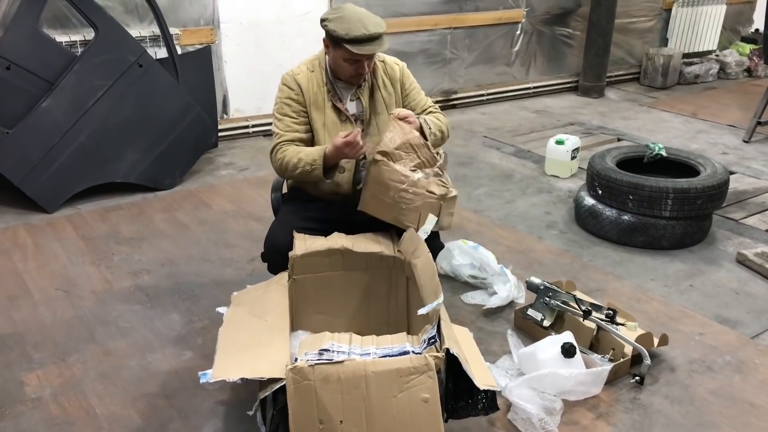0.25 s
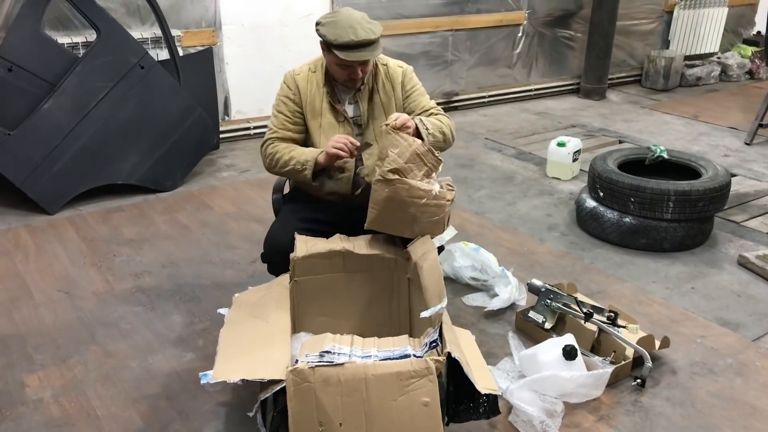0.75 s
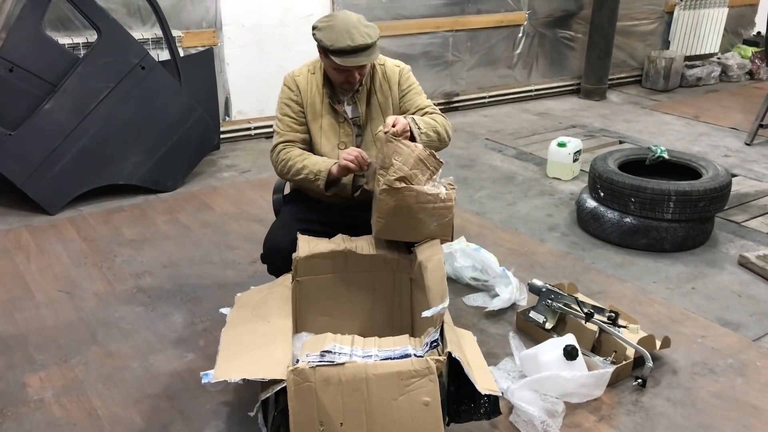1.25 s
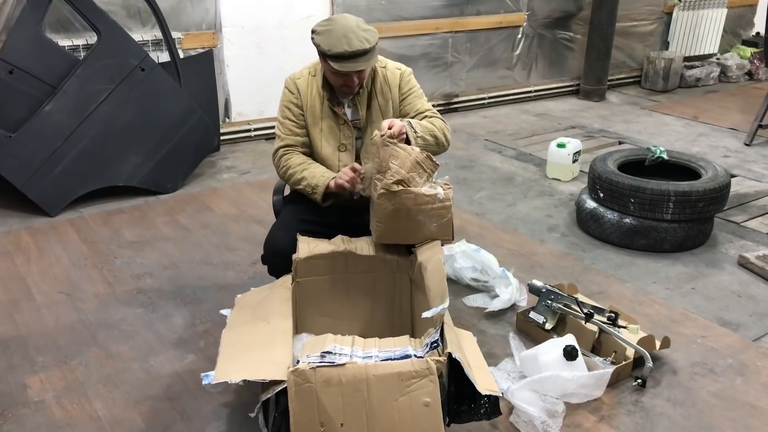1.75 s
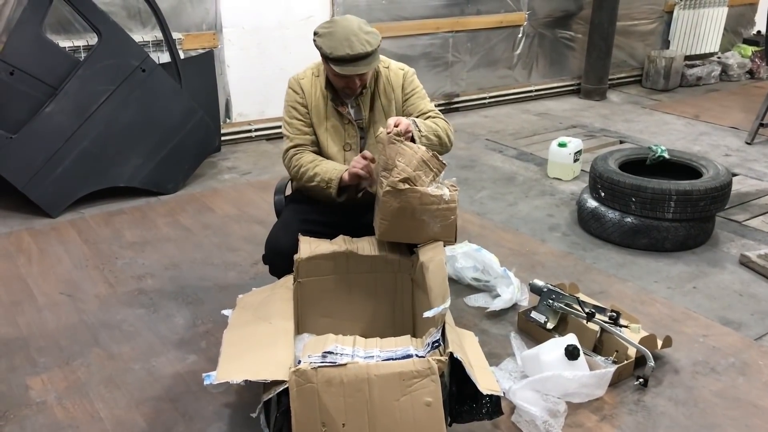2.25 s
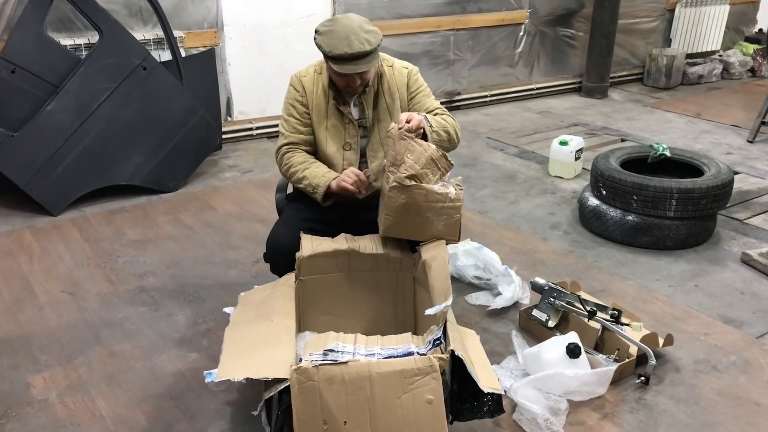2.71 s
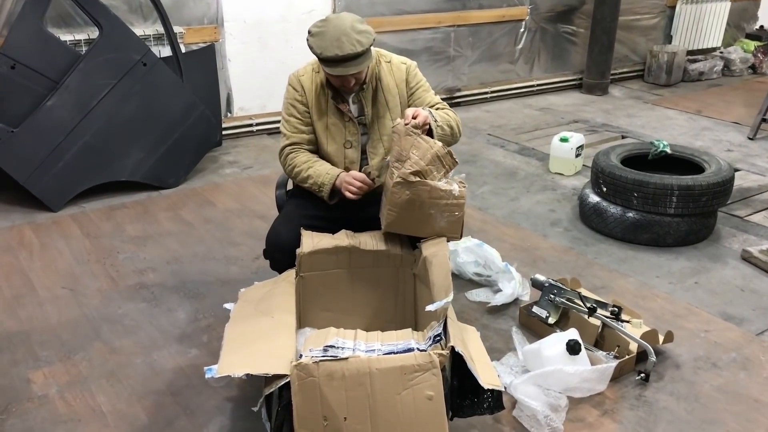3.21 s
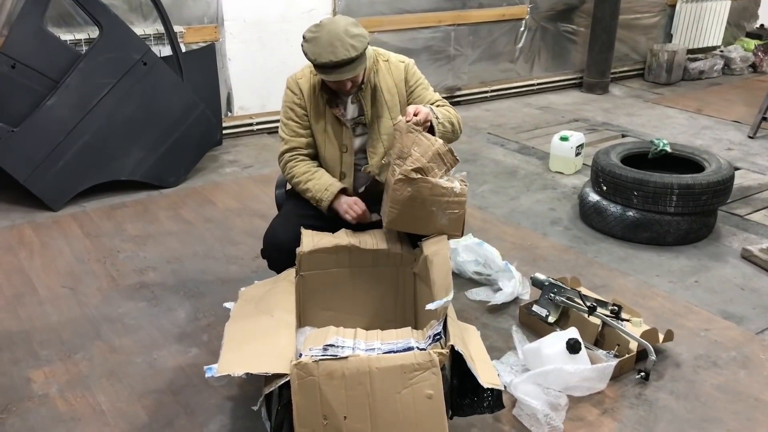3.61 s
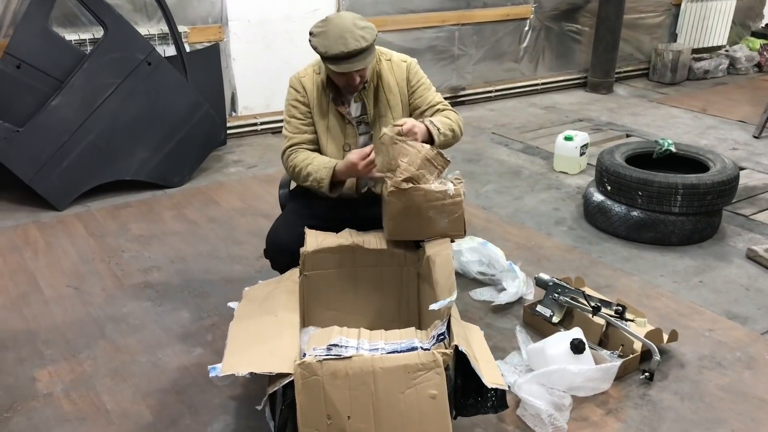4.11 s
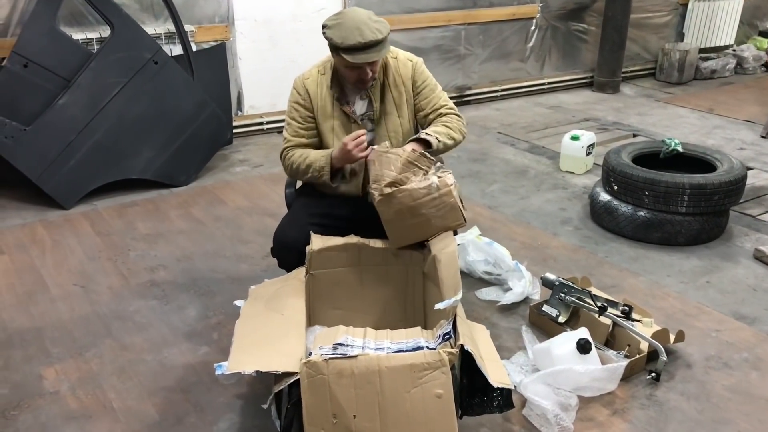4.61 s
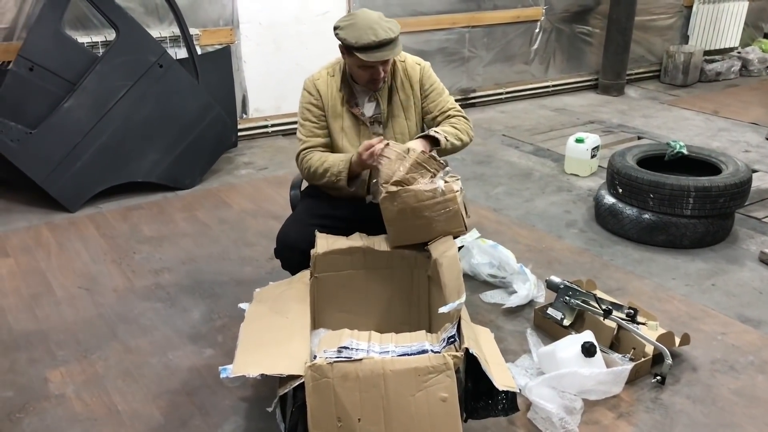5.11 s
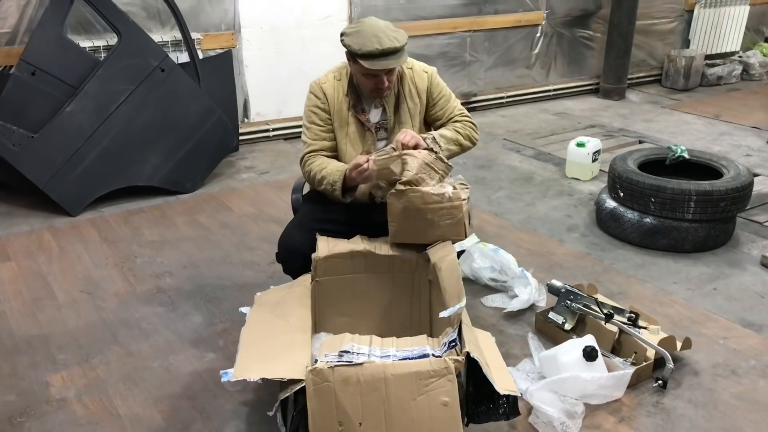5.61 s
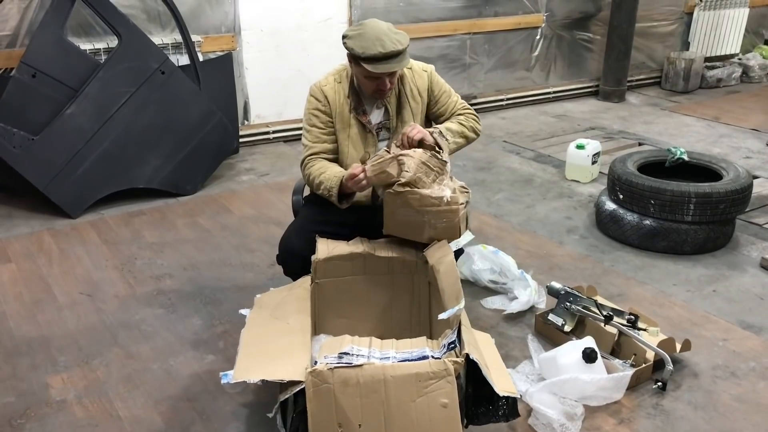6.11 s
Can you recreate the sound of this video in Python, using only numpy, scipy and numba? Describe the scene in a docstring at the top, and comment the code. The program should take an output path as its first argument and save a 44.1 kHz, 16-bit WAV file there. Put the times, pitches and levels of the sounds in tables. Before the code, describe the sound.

Hands work stiff wrapping paper on a small parcel, with faint rustles, growing bursts of crumpling and hard crackling pops near the end, over low room rumble.

```python
"""Thick brown paper crumples and tears as hands wrap a parcel in a concrete garage.
Creases buckle in swarms of tiny cracks: band-filtered noise under decaying bursts of power.
Larger creases snap singly, and dragged palms send uneven noise slips through a parcel resonance.
Free panels and the hollow parcel ring along; bare walls add a short noise tail.
Shaped noise lies underneath: the building's low rumble and the microphone's hiss."""
import sys
import numpy as np
from scipy import signal
from scipy.fft import rfft, irfft, next_fast_len
from scipy.io import wavfile
from scipy.ndimage import uniform_filter1d
from numba import njit

SR = 44100
rng = np.random.default_rng(int(sys.argv[2]) if len(sys.argv) > 2 else 0)


def materialize(psi):
    """Save the field psi as 16-bit PCM at rate SR to the path in sys.argv[1].

    A 1-D psi becomes a single channel; in a 2-D psi each row is a channel.
    """
    bounded = np.clip(np.atleast_2d(psi).T, -1, 1)
    quanta = np.round(bounded * 32767).astype(np.int16)
    wavfile.write(sys.argv[1], SR, quanta)


def gain_from_decibels(decibels):
    """Convert decibel values to linear amplitude factors."""
    exponent = np.asarray(decibels, float) / 20
    return 10 ** exponent


N = 280035
TIME = np.arange(N) / SR
BANDS_HZ = 125 * 2 ** np.arange(0, 7.1, .5)  # half-octave steps


def unit(x):
    """Scale to rms 1."""
    return x / np.sqrt(np.mean(x ** 2))


def spectrum_db(table, hz):
    """Read (frequency [Hz], level [dB]) points on a log-frequency axis."""
    points_hz, db = np.transpose(table)
    return np.interp(np.log(np.maximum(hz, 1)), np.log(points_hz), db)


def curve(table, column):
    """Join one column of rows that begin with a time [s] by straight lines."""
    columns = np.transpose(table)
    return np.interp(TIME, columns[0], columns[column])


def band(x, hz):
    """Keep half an octave round hz."""
    edges = hz * 2 ** -.25, min(hz * 2 ** .25, .48 * SR)
    return signal.sosfilt(signal.butter(2, edges, "bandpass", fs=SR, output="sos"), x)


def fade(x, t60):
    """Let every impulse of power die away 60 dB in t60 seconds."""
    return signal.lfilter([1], [1, -np.exp(-2 * np.log(1000) / (t60 * SR))], x)


def by_part(hz, parcel, sheet, crackle):
    """Blend levels: parcel in the lows, sheet in the middle, crackle in the treble."""
    place = np.interp(np.log(hz), np.log([450, 1000, 2000, 4000]), [0, 1, 1, 2])
    return parcel * max(1 - place, 0) + sheet * (1 - abs(place - 1)) + crackle * max(place - 1, 0)


# Hands shifting the parcel between pulls:
# (time [s], relative crackle level [dB], body against crackle [dB])
HANDLING = [(0.0, -53.5, -4), (0.63, -57.5, -4), (0.87, -68, -1), (1.45, -64.5, -1), (1.63, -57, -2),
            (2.47, -69.5, -9), (2.67, -68, 2), (3.25, -71.5, -5), (4.12, -63, -5.5), (4.24, -47.5, -2),
            (4.42, -46.5, -6.5), (5.04, -62, 0), (5.25, -42, -10), (5.48, -57, -3), (5.94, -52, -7.5),
            (6.35, -58.5, -4)]
# Pulls that crumple or rip the sheet:
# (start [s], rise [s], hold [s], relative crackle level [dB], body against crackle [dB])
PULLS = [(.10, 0.042, 0.048, -50, -2), (0.433, .05, 0.046, -53, -2.5), (0.677, 0.022, 0.12, -54, -12),
         (1.15, .01, 0.079, -59, -0.5), (1.567, 0.014, 0.12, -51, -7), (1.728, 0.021, 0.037, -51, 1),
         (1.831, .02, 0.023, -44, -5.5), (1.998, 0.036, 0.066, -41.5, -5.5), (2.242, 0.009, 0.061, -39, -4),
         (2.366, 0.11, 0.087, -42, -4.5), (2.836, 0.016, 0.028, -58, -3.5), (3.473, 0.027, 0.13, -36, -5.5),
         (4.046, 0.013, 0.075, -50, -6.5), (4.44, 0.03, 0.0085, -36.5, -15),
         (4.539, 0.016, 0.025, -39.5, -16.5), (4.766, 0.0088, .05, -47.5, -11),
         (4.878, 0.012, 0.016, -56, -2.5), (5.02, 0.055, 0.058, -37.5, -9.5), (5.249, .02, 0.057, -33, -10),
         (5.373, 0.0042, 0.054, -43, -11), (5.648, 0.027, 0.027, -47.5, -9),
         (5.737, 0.0056, 0.025, -33, -7.5), (5.83, 0.0092, 0.013, -44, -15),
         (5.944, 0.067, 0.026, -37.5, -8.5), (6.173, 0.035, 0.057, -55.5, -10)]


def effort():
    """Hand force as levels in dB of belly, body and crackle: steady handling plus every pull."""
    rise_from_db, sag_db_per_s, extra_release_db_per_s = -19, 29, 278
    belly_db, belly_lag_s, extra_belly_sag_db_per_s = -1.5, 0.011, 42
    crackle = gain_from_decibels(2 * curve(HANDLING, column=1))
    body = crackle * gain_from_decibels(2 * curve(HANDLING, column=2))
    belly = body
    for start, rise, hold, db, body_db in PULLS:
        t = TIME - start - rise
        # every pull swells, tires, then lets go
        swell_db = -rise_from_db * t / rise
        tire_db = -sag_db_per_s * t - extra_release_db_per_s * np.maximum(t - hold, 0)
        power = gain_from_decibels(2 * (db + np.where(t < 0, swell_db, tire_db)))
        crackle = crackle + power
        body = body + power * gain_from_decibels(2 * body_db)
        belly = belly + power * gain_from_decibels(2 * (body_db - extra_belly_sag_db_per_s * np.maximum(t, 0)))
    # the hollow belly answers late
    belly = np.interp(TIME - belly_lag_s, TIME, belly) * gain_from_decibels(2 * belly_db)
    return 10 * np.log10([belly, body, crackle])


def rustle_power(colour_db=3.5, crack_t60_at_8k_s=0.0032, jerk_db=2.0):
    """Swarms of cracks, few large and many small, each its own colour, over sheet sliding on sheet."""
    cracks_per_s, spread_db, largest_db, slide_share = 500, 4.5, 13, .4
    parcel_db, sheet_db, crackle_db = effort()
    chance = rng.random((int(cracks_per_s * N / SR), 2))
    at = (chance[:, 0] * N).astype(int)
    # exponential spread of sizes under a soft ceiling
    size_db = largest_db * np.tanh(-spread_db * np.log(1 - chance[:, 1]) / largest_db)
    colour = rng.standard_normal((len(at), len(BANDS_HZ)))
    # neighbouring bands share part of their colour
    colour = uniform_filter1d(colour, size=3, axis=1) * np.sqrt(3)
    # the fingers advance in jerks, 70 a second
    jerks = gain_from_decibels(2 * jerk_db * np.interp(TIME, np.arange(450) / 70, rng.standard_normal(450)))
    powers = []
    for k, hz in enumerate(BANDS_HZ):
        cracks = np.bincount(at, gain_from_decibels(size_db + colour_db * colour[:, k]) ** 2, N)
        # larger panels ring longer
        cracks = fade(cracks, crack_t60_at_8k_s * (8000 / hz) ** 1.2)
        texture = slide_share + (1 - slide_share) * cracks / cracks.mean()
        db = by_part(hz, parcel_db, sheet_db + 5.5, crackle_db)
        powers.append(gain_from_decibels(2 * db) * jerks * texture)
    return np.array(powers)


# Noise floor, shape only: (frequency [Hz], relative level [dB])
GARAGE = [(21, 14), (36, 11), (88, 5), (992, -18), (1190, -21), (1310, -58), (4360, -46), (7830, -19),
          (16000, -32)]


def garage():
    """Steady rumble of the building and hiss of the microphone, as spectrally shaped noise."""
    level_db = -58.5  # rms
    size = next_fast_len(N)
    hz = np.arange(size // 2 + 1) * SR / size
    spectrum = rfft(rng.standard_normal(size)) * gain_from_decibels(spectrum_db(GARAGE, hz))
    return gain_from_decibels(level_db) * unit(irfft(spectrum, size)[:N])


# Single snaps: (time [s], relative peak level [dB], body against peak [dB],
# top against peak [dB], shudder against crack [dB])
SNAPS = [(0.1545, -40, -7, -24, -19.5), (0.3177, -39, -14, -11, -15), (0.3441, -36.5, -12.5, -12, -14),
         (0.3835, -36.5, -17.5, -13, -9), (0.6858, -39, -30, -16, -14), (0.7203, -47, -18, -15, -19),
         (0.8989, -50, -14, -5, -16), (1.265, -46.5, -14, -28, -7), (1.3862, -47, -31, -12, -15),
         (1.3974, -41.5, -28, -29, -6), (1.4132, -40.5, -30, -2, -22), (1.4701, -54, -13, 2, -13),
         (1.5419, -43, -9, -5, -13), (1.5743, -38, -16, 1.5, -19), (1.6482, -36, -22, -11, -25),
         (1.6584, -37, -28, -3, -22), (1.697, -27, -50, -11, -32), (1.7564, -34.5, -17, -23, -13),
         (1.7759, -28.5, -23.5, -16.5, -15), (1.8292, -31.5, -31, -2.5, -18),
         (1.8517, -33.5, -11.5, -17, -27), (2.0263, -30.5, -21.5, -33, -7.5),
         (2.1011, -33.5, -17, -18, -9.5), (2.1964, -40, -10, -12, -14), (2.2338, -38, -7, -6, -19),
         (2.2503, -22.5, -8, -12.5, -14), (2.2974, -36, -17, -13, -13), (2.3234, -34, -7.5, -20, -23),
         (2.5077, -27.5, -17, -27, -12.5), (2.6114, -54, 9.5, -17, -9), (2.7397, -43.5, -23, 0, -13),
         (2.9786, -38, -31, -8, -27.5), (3.041, -48, -26, 0, -17), (3.4875, -29.5, -24, -15, -12),
         (3.5064, -29.5, -7.5, -15, -11.5), (3.5533, -23.5, -27, -3.5, -9.5), (3.5682, -26, -16, -9, -15),
         (3.5954, -30, -19, -8, -9), (3.8297, -54, -38, -5, -6), (3.8646, -40.5, -34, -14.5, -14),
         (3.918, -41, -32, -28, -12), (4.0642, -36, -12, -14, -14), (4.3006, -32.5, -22, -27, -12),
         (4.351, -33, -12, -16, -16), (4.3799, -29, -18, -25, -15), (4.4762, -25.5, -27, -7, -9),
         (4.56, -29, -27.5, -8, -14), (4.5746, -21, -33, -9, -19), (4.6528, -34.5, -15, -11.5, -8),
         (4.779, -29.5, -28, -14, -11), (4.8135, -30.5, -21, -4, -23), (5.033, -31, -29, -34, -7),
         (5.0544, -31, -23, -34, -11.5), (5.0868, -20.5, -16.5, -32, -28),
         (5.2699, -13, -5.5, -10.5, -15.5), (5.3143, -22.5, -6.5, -5, -17.5),
         (5.3817, -13.5, -17, -14.5, -13), (5.5169, -38, -16, -30, -7.5), (5.5657, -36.5, -42, -21, -20),
         (5.6665, -24, -33, -35, -21), (5.7004, -28.5, -16, -16, -14), (5.7394, -23, -10, -17.5, -6.5),
         (5.8491, -22, -24.5, -18, -14), (5.917, -39.5, -22, -17, -6), (5.9663, -31.5, -15, -2.5, -16),
         (6.1539, -42, -31, -8, -7), (6.2697, -37.5, -9, -13, -22)]


def snap_power(colour_db=3.0, crack_t60_at_8k_s=0.00093, shudder_t60_at_8k_s=0.024, snap_db=4):
    """A crease gives way: a sharp crack, then the sheet shudders to rest."""
    body_drive_db, belly_drive_db, top_drive_db = 14, 4.5, 12  # how well a snap drives each part
    powers = np.zeros((len(BANDS_HZ), N))
    colour = rng.standard_normal((len(SNAPS), len(BANDS_HZ)))
    for (s, peak_db, body_db, top_db, shudder_db), tint in zip(SNAPS, colour):
        start = int(s * SR)
        t = TIME[:min(int(.2 * SR), N - start)]
        for k, hz in enumerate(BANDS_HZ):
            crackle_db = np.interp(hz, [7000, 11000], [0, top_db + top_drive_db])
            part_db = by_part(hz, body_db + belly_drive_db, body_db + body_drive_db, crackle_db)
            db = peak_db + snap_db + part_db + colour_db * tint[k]
            slow = (8000 / hz) ** 0.4  # lower bands die more slowly
            crack = gain_from_decibels(-120 * t / (crack_t60_at_8k_s * slow))
            shudder = gain_from_decibels(2 * shudder_db - 120 * t / (shudder_t60_at_8k_s * slow))
            powers[k, start:start + len(t)] += gain_from_decibels(2 * db) * (crack + shudder)
    return powers


def wander(hz, wander_octaves=0.44, regrips_per_s=6):
    """A ring frequency that glides to a new place with every change of grip."""
    steps = rng.standard_normal(100)
    return hz * 2 ** (wander_octaves * np.interp(TIME * regrips_per_s, np.arange(len(steps)), steps))


@njit
def ring(x, hz, q):
    """Resonance whose centre moves with every sample, gain 1 at the centre."""
    y, band_state, low_state = np.empty(len(x)), 0., 0.
    for i in range(len(x)):
        g = np.tan(np.pi * hz[i] / SR)
        v = (band_state + g * (x[i] - low_state)) / (1 + g * (g + 1 / q))
        band_state = 2 * v - band_state
        low_state = low_state + 2 * g * v
        y[i] = v / q
    return y


# Colour of the paper: (frequency [Hz], relative level [dB])
PAPER = [(59, -35), (100, -1), (189, -2), (676, -9), (784, 10), (1010, -11), (3400, -9.5), (7770, -11),
         (16000, -11)]
# Hollow modes of the parcel: (frequency [Hz], width [Hz], relative gain [dB])
PARCEL = [(184.4, 8.3, 3.5), (382, 70, 11), (707, 12, -41), (1217, 276, 4)]


def paper():
    """The cracks shake the sheet band by band; free panels and the hollow parcel ring along."""
    panel_hz, belly_hz = 1250, 215
    fibres = rng.standard_normal(N)
    # each snap opens with one hard break of the fibres
    fibres[(np.transpose(SNAPS)[0] * SR).astype(int)] = -1.7
    power = rustle_power() + snap_power()
    tilt_db = spectrum_db(PAPER, BANDS_HZ)
    sheet = np.zeros(N)
    for k, hz in enumerate(BANDS_HZ):
        # neighbouring bands alternate in sign
        sheet += (-1) ** k * gain_from_decibels(tilt_db[k]) * band(np.sqrt(power[k]) * fibres, hz)
    hollow = np.zeros(N)
    for hz, width, db in PARCEL:
        hollow += gain_from_decibels(db) * signal.lfilter(*signal.iirpeak(hz, hz / width, SR), sheet)
    # the grip changes the size of the free panels, so their rings wander
    panel = gain_from_decibels(-4) * ring(sheet, wander(panel_hz), 6.)
    belly = gain_from_decibels(7.5) * ring(sheet, wander(belly_hz), 3.37)
    return gain_from_decibels(7.5) * (sheet + gain_from_decibels(-7.5) * hollow + panel + belly)


# Palm dragged over the parcel: (time [s], length [s], rms level before the room [dB],
# ring [Hz], width of each of two resonator passes before its cap [Hz])
DRAGS = [(.39, 0.21, -58, 229, 50.3), (1.466, .11, -66, 414, 150), (1.753, 0.043, -56, 1100, 900),
         (1.844, 0.051, -52.5, 760, 302), (2.252, 0.024, -42.5, 150, 200), (2.576, 0.053, -51, 1070, 300),
         (2.626, 0.2, -65.5, 1026, 260), (2.622, 0.16, -66, 2310, 700), (3.155, 0.086, -71.5, 1170, 1220),
         (3.501, 0.056, -43, 778, 96), (3.529, 0.14, -46.5, 205, 303), (4.249, 0.18, -56.5, 215, 150),
         (4.496, 0.184, -58.5, 360, 40), (4.555, 0.014, -46, 3300, 600), (4.717, 0.068, -61.5, 2070, 300),
         (4.74, .2, -62.5, 250, 300), (5.736, 0.023, -34, 374, 121), (6.001, 0.042, -49.5, 396, 200)]


def drags(stick_db=3.0, fade_db=-6.0, edge_s=0.0083):
    """Rough paper catches and lets go in quick uneven slips that ring one panel."""
    slip = 100  # samples
    out = np.zeros(N)
    for s, length, db, hz, width in DRAGS:
        start, t = int(s * SR), TIME[:int(.4 * SR)]
        slip_db = stick_db * rng.standard_normal(len(t) // slip + 1)
        slips = gain_from_decibels(np.repeat(slip_db, slip)[:len(t)])
        push = np.clip(np.minimum(t, length - t) / edge_s, 0, 1) * gain_from_decibels(fade_db * t / length)
        sound = unit(slips * rng.standard_normal(len(t))) * push
        peak = signal.iirpeak(hz, hz / min(width, 1.6 * hz), SR)
        sound = signal.lfilter(*peak, signal.lfilter(*peak, sound))
        sound = sound * gain_from_decibels(db) / np.sqrt(np.sum(sound ** 2) / (length * SR))
        out[start:start + len(t)] += sound[:N - start]
    return out


def walls(x):
    """Bare walls: the direct sound, then a dense noise tail whose treble outlasts its lows."""
    low_t60_s, top_t60_s, tail_db = 0.15, 0.26, -6.5  # tail energy against direct
    t = TIME[:int(.6 * SR)]
    noise = rng.standard_normal(len(t)) * np.minimum(t / 0.0017, 1)  # builds up in 1.7 ms
    low = signal.sosfilt(signal.butter(1, 2500, fs=SR, output="sos"), noise)
    tail = low * gain_from_decibels(-60 * t / low_t60_s) + (noise - low) * gain_from_decibels(-60 * t / top_t60_s)
    tail = tail * gain_from_decibels(tail_db) / np.sqrt(np.sum(tail ** 2))
    tail[0] = 1  # direct sound
    return signal.fftconvolve(x, tail)[:N]


def scene():
    """Paper and palms in the room, over the noise floor."""
    return (walls(paper() + drags()) + garage())[None]


def band_limit(x):
    """A steep low-pass at the top of the band."""
    return signal.sosfilt(signal.butter(12, 16970, fs=SR, output="sos"), x)


# Microphone housing, dips and a lift: (frequency [Hz], width [Hz], gain [dB])
HOUSING = [(4890, 600, -3.5), (7810, 1700, -4.5), (10360, 1800, -4), (15100, 820, 4.5)]


def record(dry):
    """The microphone housing notches and lifts the treble; deep bass and extreme top are cut."""
    for hz, width, db in HOUSING:
        dry = dry - (1 - gain_from_decibels(db)) * signal.lfilter(*signal.iirpeak(hz, hz / width, SR), dry)
    dry = signal.sosfilt(signal.butter(4, 36, "highpass", fs=SR, output="sos"), dry)
    mix = signal.sosfilt(signal.ellip(8, .2, 45, 15850, fs=SR, output="sos"), dry)
    return band_limit(mix)


dry = scene()
out = record(dry)
materialize(out)
```